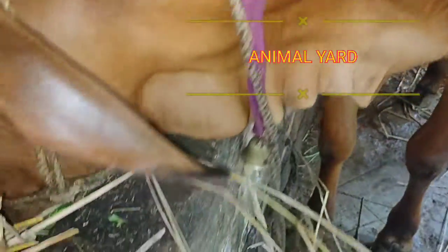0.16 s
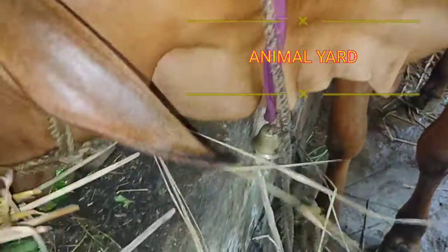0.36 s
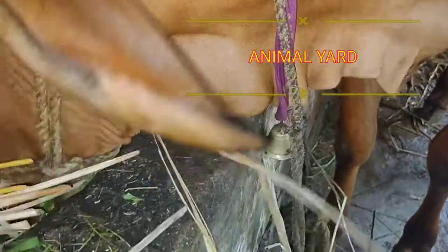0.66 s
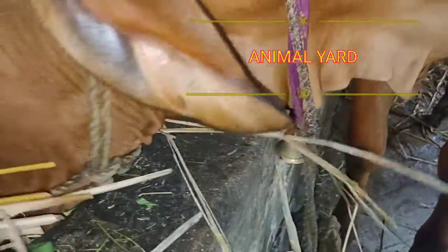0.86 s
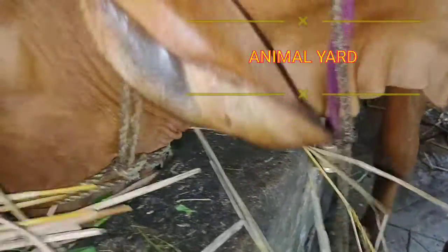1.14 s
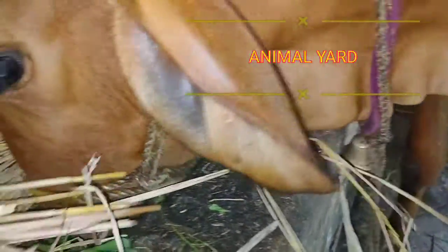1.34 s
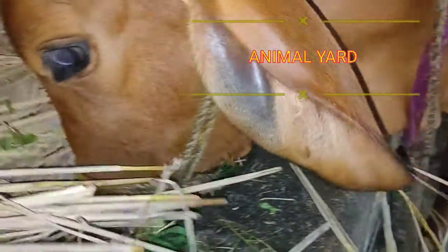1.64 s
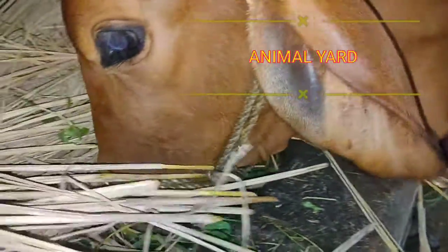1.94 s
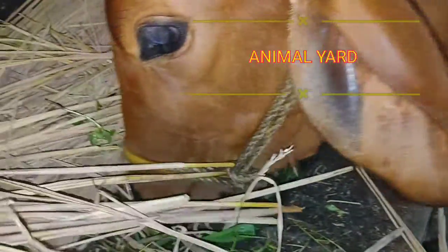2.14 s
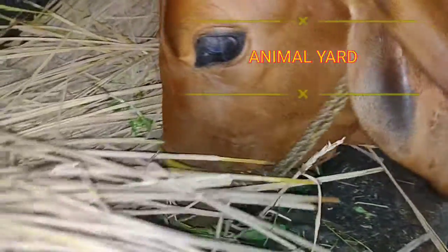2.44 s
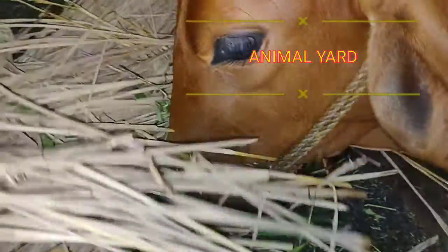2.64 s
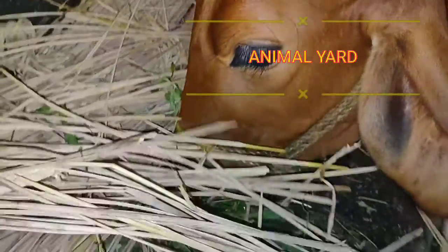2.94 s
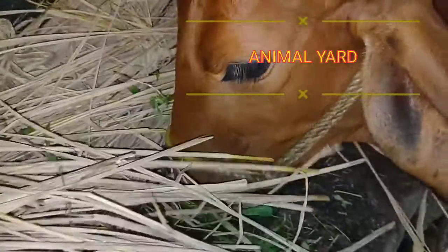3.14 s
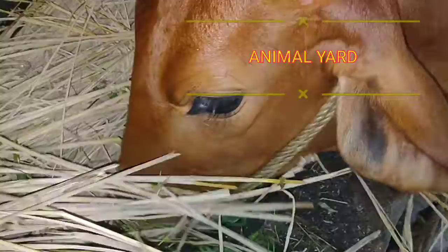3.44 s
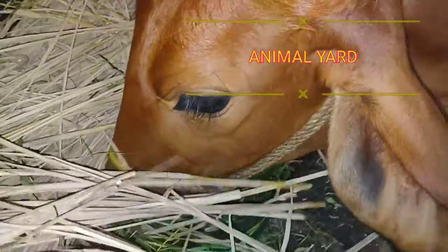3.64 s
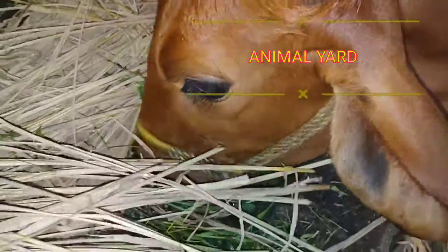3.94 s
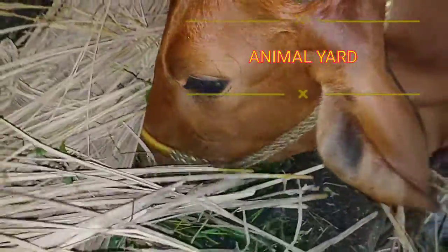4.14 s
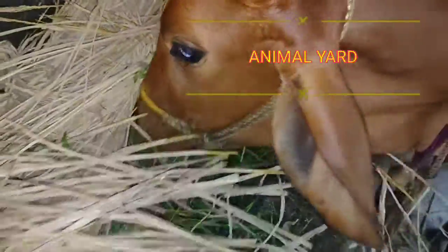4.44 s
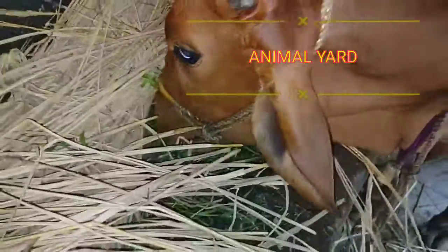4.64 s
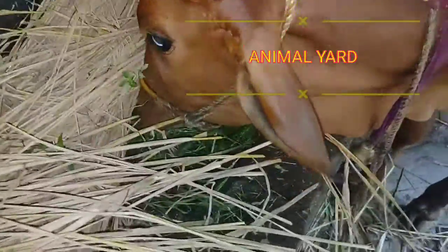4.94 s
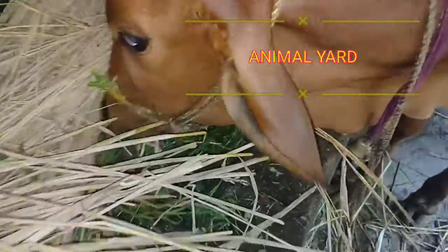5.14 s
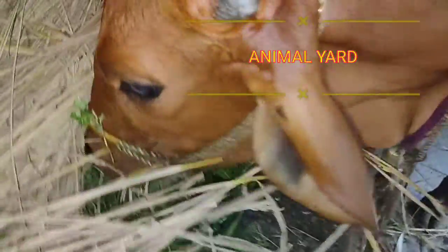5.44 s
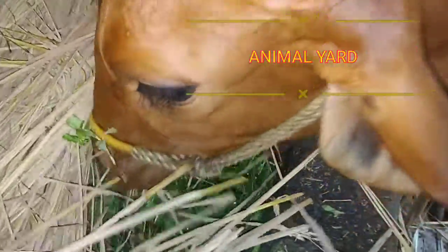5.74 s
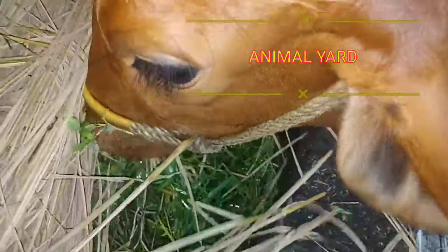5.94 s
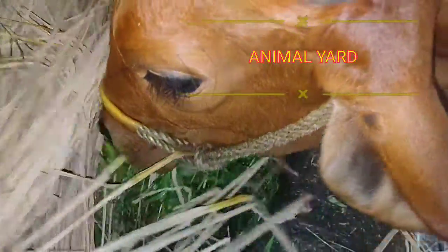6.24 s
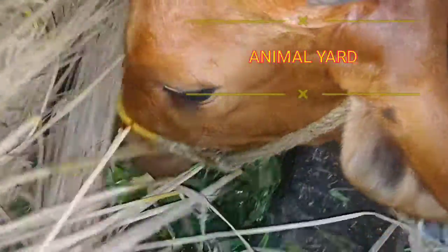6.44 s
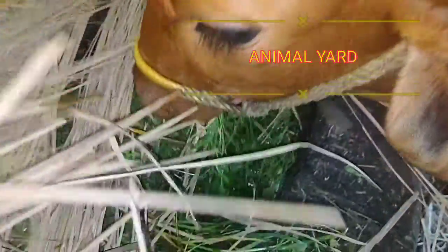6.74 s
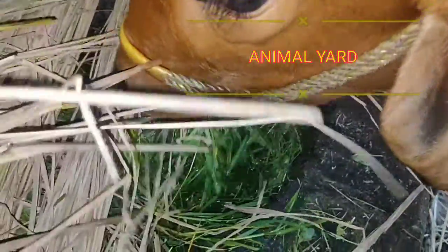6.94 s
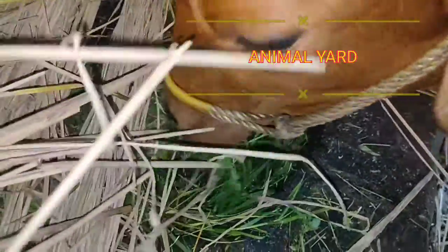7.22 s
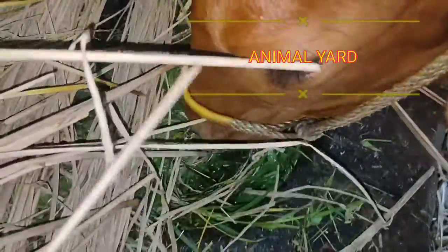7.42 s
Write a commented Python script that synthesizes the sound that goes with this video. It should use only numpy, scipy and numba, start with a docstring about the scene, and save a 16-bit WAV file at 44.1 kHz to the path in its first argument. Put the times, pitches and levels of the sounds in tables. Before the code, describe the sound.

A phone microphone sits close to a cow eating in an open shed with slight short reverberation. From 0 s, soft straw rustling comes in short pushes over a low, wavering, throbbing hum. A muffled crunch at about 0.85 s starts slow, irregular chewing, roughly every 0.8 s, hollow and grinding. Wet smacks click near 1.7-1.9 and 2.7 s. At 2.9-3.1 s dull low trough knocks mix with crunches; grass tearing thickens. Small stalk snaps scatter throughout, a firmer one at 4.3 s. The bird gives tiny faint peeps at 0.5 and 3.8 s, then a quick chatter at 5.3 s and steady, swooping high chirps from 5.5 s to the end, growing loud. Rustling and tearing surge from 6 to 6.9 s, capped by a very loud, bright snap at 6.83 s. Softer rustling, a smack and small snaps finish by 7.5 s.

```python
"""Cow feeding in an open shed

A cow feeds on fresh grass under dry straw, close to a phone. Straw rustles and blades tear as bunches of
tiny random breaks; stalks snap as noise bursts through resonances; the jaw grinds about every 0.8 s
through a moving mouth resonance. Wet smacks, low rubs and dull knocks are short tones.
A low hum wavers and throbs behind; a small bird of swooping tones, faint at first, chirps loudly at the end.
"""
import sys
import numpy as np
from scipy import signal
from scipy.fft import rfft, irfft, next_fast_len
from scipy.io import wavfile
from scipy.ndimage import uniform_filter1d
from numba import njit

SR = 44100
rng = np.random.default_rng(int(sys.argv[2]) if len(sys.argv) > 2 else 0)


def transcribe(signal):
    """Save signal, clipped to [-1, 1], as a 16-bit WAV file at the path in sys.argv[1]."""
    frames = np.atleast_2d(signal).T
    limited = np.clip(frames, -1, 1)
    pcm = np.round(limited * 32767).astype(np.int16)
    wavfile.write(sys.argv[1], SR, pcm)


N = 334258
T = np.arange(N) / SR


def undb(db):
    """Turn decibels into a gain."""
    return 10 ** (np.asarray(db) / 20)


def unit(x):
    """Scale a sound to an average (rms) level of 1."""
    return x / np.sqrt(np.mean(x ** 2))


def curve(table):
    """Join (time_s, value) points with straight lines, sample by sample."""
    return np.interp(T, *np.transpose(table))


def add(track, start_s, sound):
    """Mix a sound into a track at a given time."""
    i = int(start_s * SR)
    track[i:i + len(sound)] += sound[:N - i]


def walk(rate):
    """Wander smoothly and randomly with spread 1, taking `rate` new values a second."""
    k = int(SR / rate)
    steps = np.repeat(rng.standard_normal(N // k + 1), k)
    smooth = uniform_filter1d(uniform_filter1d(steps, k), k)
    return unit(smooth[:N])


def colour(x, points):
    """Filter through (pitch_hz, level_db) points, falling away beyond them, with no pre-echo; rms 1."""
    hz, db = np.transpose(points)
    size = next_fast_len(N + SR // 4) * 2
    log_f = np.log(np.maximum(np.arange(size // 2 + 1) * SR / size, 1))
    outside = np.abs(log_f - np.clip(log_f, np.log(hz[0]), np.log(hz[-1])))
    gain = undb(np.interp(log_f, np.log(hz), db) - 20 * outside)
    # folding the cepstrum gives a filter that only responds after its input
    cepstrum = irfft(np.log(gain))
    cepstrum[1:size // 2] *= 2
    cepstrum[size // 2 + 1:] = 0
    response = np.exp(rfft(cepstrum))
    return unit(irfft(rfft(x, size) * response)[:N])


def ring(x, modes):
    """Pass a sound through side-by-side resonances (pitch_hz, width_hz, level_db)."""
    out = 0
    for hz, width, db in modes:
        out = out + undb(db) * signal.lfilter(*signal.iirpeak(hz, hz / width, fs=SR), x)
    return out


def fibres(rate, spread_db, bunch_db, bunch_rate):
    """Tiny fractures, `rate` a second at random moments, mostly small, that come in bunches."""
    breaks = rng.random(N) < rate / SR
    sizes = undb(spread_db * np.minimum(rng.exponential(size=N), 4))
    signs = rng.choice([-1, 1], N)
    return breaks * sizes * signs * undb(bunch_db * walk(bunch_rate))


def efforts(table, attack_s, release_s, sag_db_per_s):
    """Each event builds up, holds while it sags, and dies away; one gain curve per dB column."""
    power = np.zeros((2, N))
    for start_s, length_s, *levels_db in table:
        near = np.abs(T - start_s) < 1 / 2
        t = T[near] - start_s
        attack = (1 + np.tanh(t / attack_s)) / 2
        release = np.exp(-(np.maximum(t - length_s, 0) / release_s) ** 2)
        shape = attack * undb(-sag_db_per_s * t) * release
        power[:, near] += np.outer(undb(levels_db), shape) ** 2
    return np.sqrt(power)


# Pushes of the muzzle through the fodder: start_s, length_s, straw_rustle_db, grass_tearing_db
MUZZLE_PUSHES = [(0.02, 0.1, -47.5, -52.5), (.115, 0.047, -43.5, -53.5), (.405, .16, -43.5, -51.5),
                 (.635, 0.14, -41, -49.5), (.79, 0.069, -41, -48.5), (.91, 0.074, -42.5, -48),
                 (1.07, 0.13, -44, -55), (1.27, 0.054, -40.5, -49.5), (1.42, 0.071, -43, -54.5),
                 (1.555, 0.026, -39.5, -49), (1.695, 0.029, -40.5, -46), (1.95, 0.11, -43, -48.5),
                 (2.015, 0.19, -42, -48), (2.24, 0.12, -45.5, -49), (2.375, 0.13, -40.5, -48),
                 (2.585, .05, -36.5, -43.5), (2.72, 0.16, -42, -48.5), (2.98, 0.0087, -39.5, -42.5),
                 (3.085, 0.02, -40.5, -46.5), (3.21, 0.15, -48, -46), (3.485, 0.16, -39, -43.5),
                 (3.72, 0.17, -45, -49.5), (3.945, .2, -43, -45), (4.185, 0.26, -43, -45.5),
                 (4.53, 0.14, -43, -48), (4.685, .15, -40, -45.5), (4.945, 0.18, -47.5, -46.5),
                 (5.15, 0.29, -39.5, -48), (5.47, 0.18, -46.5, -47.5), (5.66, 0.16, -42.5, -45),
                 (5.835, 0.17, -37.5, -44.5), (6.045, 0.28, -31.5, -38.5), (6.385, 0.15, -32.5, -40),
                 (6.595, 0.19, -35.5, -40), (6.835, 0.07, -31.5, -39), (7.0, 0.16, -42, -48),
                 (7.255, .19, -43.5, -43.5), (7.545, .03, -40, -49.5)]


def pushes():
    """The muzzle shoves into the heap and eases off: gain curves for straw and grass."""
    return efforts(MUZZLE_PUSHES, attack_s=0.029, release_s=0.097, sag_db_per_s=8.5)


# Tone of sliding straw: pitch_hz, relative_level_db (per Hz)
STRAW_COLOUR = [(1500, -43), (2300, -7.5), (2750, -4), (3400, -6.5), (4300, -6), (5200, -6.5), (6000, -3),
                (6600, -0.5), (7300, -3), (7800, -12), (8200, -28)]
# Tone of tearing grass: pitch_hz, relative_level_db (per Hz)
GRASS_COLOUR = [(600, -33.5), (1200, -3.5), (1600, -4), (2000, -0.5), (2500, 1), (3200, -3.5), (4200, -6.5),
                (6000, -29.5)]
STRAW_REST_DB, GRASS_REST_DB = -49.5, -67.5  # the heap settling between pushes


def fodder(rustle, tear):
    """Dry straw slides in a fine dense crackle; fresh blades tear in coarser, duller grains."""
    straw = colour(fibres(rate=9000, spread_db=2.5, bunch_db=0.5, bunch_rate=63), STRAW_COLOUR)
    grass = colour(fibres(rate=3000, spread_db=1.0, bunch_db=1.55, bunch_rate=70), GRASS_COLOUR)
    straw_gain = np.hypot(rustle, undb(STRAW_REST_DB))
    grass_gain = np.hypot(tear, undb(GRASS_REST_DB))
    return straw_gain * straw + grass_gain * grass


# Strokes of the jaw, as the mouth's resonance slides: start_s, length_s, start_hz, lips_closed_hz
JAW_STROKES = [(0.0, .14, 350, 400), (0.869, .11, 540, 290), (1.534, .14, 470, 310), (2.192, .36, 483, 328),
               (3.051, .31, 502, 300), (4.062, 0.16, 560, 320), (4.672, 0.33, 500, 303),
               (5.561, .22, 382, 280), (6.107, .38, 452, 330), (7.016, 0.4, 481, 249)]
MOUTH_OPEN_HZ, MOUTH_MOVE_S = 613, 0.023


def mouth_resonance():
    """The resonance slides as the lips close through each chew, and comes back when they part."""
    hz = np.full(N, float(MOUTH_OPEN_HZ))
    for start_s, length_s, start_hz, closed_hz in JAW_STROKES:
        closing = (T >= start_s) & (T < start_s + length_s)
        hz[closing] = np.geomspace(start_hz, closed_hz, closing.sum())
    return uniform_filter1d(hz, int(MOUTH_MOVE_S * SR))


@njit
def cavity(x, hz, width):
    """A hollow that rings around one pitch: a band-pass whose centre moves sample by sample."""
    y, band, low = np.empty(len(x)), 0., 0.
    for i in range(len(x)):
        g, k = np.tan(np.pi * hz[i] / SR), width / hz[i]
        v = (band + g * (x[i] - low)) / (1 + g * (g + k))
        band, low, y[i] = 2 * v - band, low + 2 * g * v, k * v
    return y


# Wads of grass giving way between the teeth: start_s, length_s, grinding_db, crunch_db
GRASS_CRUSHES = [(0.0, 0.074, -56, -57), (.85, 0.072, -46.5, -48), (1.08, 0.033, -50.5, -51.5),
                 (1.32, 0.042, -54, -58), (1.545, 0.11, -54.5, -52.5), (1.64, 0.04, -48, -49.5),
                 (1.718, 0.017, -50, -42.5), (1.83, 0.055, -65, -57.5), (1.928, 0.0062, -63, -50),
                 (2.245, 0.034, -41.5, -52), (2.395, 0.072, -42, -43), (2.465, 0.037, -42, -44.5),
                 (2.695, 0.035, -69, -44.5), (2.98, 0.089, -47.5, -53.5), (3.095, 0.039, -37.5, -51),
                 (3.17, .06, -47, -45.5), (3.232, 0.043, -39.5, -40), (3.31, 0.027, -48.5, -51),
                 (4.04, 0.051, -40.5, -41), (4.11, 0.067, -45.5, -48), (4.705, 0.18, -51, -58),
                 (4.855, 0.071, -46.5, -46.5), (4.982, 0.044, -44.5, -47), (5.615, 0.13, -46.5, -48.5),
                 (6.125, 0.046, -40, -49.5), (6.22, 0.12, -45.5, -45.5), (6.39, 0.15, -52.5, -46.5),
                 (6.82, 0.088, -54, -49), (7.025, 0.087, -49, -56), (7.21, .02, -48.5, -49),
                 (7.275, 0.0053, -39.5, -42)]
# Tone of the grinding before the mouth: pitch_hz, relative_level_db (per Hz)
GRIND_COLOUR = [(150, -27.5), (205, 2), (243, 8.5), (272, 3), (305, 2), (400, -2.5), (520, -1), (680, 1),
                (820, -6), (1050, -21), (2500, -47.5)]
# Tone of the crunch: pitch_hz, relative_level_db (per Hz)
CRUNCH_COLOUR = [(450, -30.5), (700, -7.5), (900, -0.5), (1030, -3.5), (1150, 1), (1300, -7), (1500, -6),
                 (2000, -9), (4000, -35)]
# Light grinding that goes on between the crushes: time_s, level_db
LIGHT_GRINDING = [(0, -66), (.35, -59.5), (.58, -70.5), (.75, -57), (1.45, -68.5), (2.1, -66), (2.9, -55),
                  (3.45, -55), (3.9, -61.5), (4.5, -66), (5.4, -68.5), (6.3, -61.5), (7.58, -64)]
GATHERING_DB = -10.5  # the lips gathering blades, against the tearing


def chewing(tear, mouth_width_hz=92.0, cheek_db=-14):
    """Teeth crush the stems; the grinding rings in the mouth and a little leaks through the cheeks."""
    grind, bite = efforts(GRASS_CRUSHES, attack_s=0.014, release_s=0.038, sag_db_per_s=26)
    molars = colour(fibres(rate=1100, spread_db=3.5, bunch_db=0.34, bunch_rate=66), GRIND_COLOUR)
    mouth = cavity(molars, mouth_resonance(), float(mouth_width_hz)) + undb(cheek_db) * molars
    crunch = colour(fibres(rate=1400, spread_db=3.0, bunch_db=1.0, bunch_rate=70), CRUNCH_COLOUR)
    grind_gain = np.hypot(grind, undb(curve(LIGHT_GRINDING)))
    crunch_gain = np.hypot(bite, undb(GATHERING_DB) * tear)
    return grind_gain * unit(mouth) + crunch_gain * crunch


# Stalks snapping: start_s, peak_db, brightness_db (gain of the splitting ring)
STALK_SNAPS = [(0.149, -32.5, -16), (1.067, -26.5, -14), (1.649, -40, -19), (1.722, -35, -16),
               (2.475, -30, -18), (3.01, -29.5, -14), (3.25, -39, -19), (3.283, -29, -28),
               (4.254, -29, -14), (4.278, -22, -20), (4.692, -34, -5), (6.614, -24, -3), (6.83, -9, 7.5),
               (7.222, -30, -23), (7.282, -28, -24), (7.367, -29, -26), (7.455, -24.5, -6)]
# What the body of a stalk rings with: pitch_hz, width_hz, level_db
BODY_RING = [(650, 110, -15.5), (1110, 190, -7), (1760, 300, -7.5), (2380, 950, 11), (3280, 800, -21.5)]
# What a splitting stalk rings with: pitch_hz, width_hz, level_db
SPLIT_RING = [(3050, 870, 10.5), (4860, 1400, -14), (6300, 99, 20.5)]


def snaps(crack_s=0.0019, splinter_s=0.0061, splinter_db=-21):
    """A stalk gives way in a short burst and splinters on; dry ones split brightly."""
    out, t = np.zeros(N), T[:SR // 16]
    soften = signal.butter(2, 4200, fs=SR, output="sos")
    crack = t / crack_s * np.exp(1 - 2 * t / crack_s)
    burst = crack + undb(splinter_db) * np.exp(-t / splinter_s)
    for start_s, peak_db, bright_db in STALK_SNAPS:
        force = burst * rng.standard_normal(len(t))
        body = signal.sosfilt(soften, ring(force, BODY_RING))
        snap = body + undb(bright_db) * ring(force, SPLIT_RING)
        add(out, start_s, undb(peak_db) * snap / np.abs(snap).max())
    return out


# Wet smacks and low rubs near the mouth: start_s, pitch_hz, fade_by_60_db_s, level_db (before the fades)
SMACKS_AND_RUBS = [(.018, 373, 0.15, -42), (.103, 398, 0.15, -43.5), (1.735, 1150, 0.054, -31),
                   (1.752, 1290, 0.081, -33), (1.93, 1110, 0.05, -33), (1.933, 660, 0.035, -33),
                   (2.701, 1060, 0.021, -20), (2.725, 1140, 0.04, -22.5), (3.102, 447, 0.036, -26),
                   (4.77, 432, 0.14, -42), (4.862, 354, 0.12, -34), (4.915, 308, .11, -36.5),
                   (5, 650, 0.16, -35), (5.026, 727, 0.15, -40.5), (6.145, 428, 0.11, -55),
                   (7.284, 245, 0.23, -30), (7.302, 1770, 0.034, -26), (7.311, 1540, 0.022, -19)]


def smacks_and_rubs(rise=0.065, onset_s=0.0032):
    """A smack or low rub rings briefly, rising a little in pitch."""
    out, t = np.zeros(N), T[:SR // 6]
    for start_s, hz, t60, db in SMACKS_AND_RUBS:
        fade = (1 - np.exp(-t / onset_s)) * np.exp(-np.log(1000) * t / t60)
        phase = 2 * np.pi * np.cumsum(hz * (1 + rise * t / t60)) / SR
        add(out, start_s, undb(db) * fade * np.sin(phase))
    return out


# Dull knocks of the muzzle in the trough: middle_s, pitch_hz, half_length_s (to 37 %), swell_db
TROUGH_KNOCKS = [(2.88, 125, 0.0067, -28), (2.919, 149, 0.01, -25), (2.957, 157, 0.0039, -23.5),
                 (2.999, 143, 0.012, -25.5), (3.033, 170, 0.0069, -32), (3.054, 149, 0.0044, -26.5),
                 (3.09, 157, 0.01, -35.5), (7.286, 236, 0.0087, -29.5)]


def knocks():
    """Soft pushes swell and die within a few low cycles."""
    out, t = np.zeros(N), T[:SR // 10] - 1 / 20
    for middle_s, hz, half_s, db in TROUGH_KNOCKS:
        swell = undb(db) * np.exp(-(t / half_s) ** 2)
        add(out, middle_s + t[0], swell * np.sin(2 * np.pi * hz * t))
    return out


# Bird notes: start_s, length_s, start_hz, held_hz, closing_hz, level_db (before shaping and mixing),
# rasp_share (pitch scatter as a share of the pitch)
BIRD_NOTES = [(0.479, 0.036, 2900, 2790, 2790, -48, 0.0045), (3.829, 0.035, 2950, 2820, 2820, -40, 0.0044),
              (4.343, .04, 4400, 4410, 4370, -44, 0.023), (5.258, 0.026, 4450, 4250, 4230, -35.5, 0.034),
              (5.286, 0.013, 3840, 4080, 4080, -25.5, 0.052),
              (5.314, 0.0098, 3860, 4010, 4080, -25.5, 0.083), (5.338, 0.018, 3955, 4100, 3984, -25, 0.029),
              (5.36, 0.012, 3800, 3970, 3920, -28.5, 0.079), (5.453, 0.038, 2950, 2845, 2510, -31, 0.033),
              (5.508, 0.013, 3380, 3410, 3320, -18.5, 0.0036), (5.51, 0.022, 3250, 3000, 2295, -24, 0.0093),
              (5.661, 0.063, 4400, 3184, 2520, -20, 0.011), (5.84, 0.037, 4200, 3150, 2650, -20, 0.0094),
              (5.999, 0.044, 4000, 3088, 2790, -20.5, 0.0084), (6.16, 0.07, 3500, 2861, 2830, -25, 0.017),
              (6.312, 0.014, 4280, 4060, 3770, -25.5, 0.042),
              (6.317, 0.041, 4200, 3094, 2720, -19.5, 0.021), (6.482, 0.05, 4150, 3290, 3254, -18.5, 0.053),
              (6.676, 0.042, 3700, 3310, 3186, -21, 0.033), (6.866, 0.037, 4150, 3014, 3040, -16, 0.0068),
              (6.936, 0.045, 3250, 2628, 2634, -20.5, 0.006), (7.118, 0.031, 3910, 3165, 3526, -16, 0.016),
              (7.154, 0.029, 3885, 2945, 2470, -23, 0.015), (7.345, 0.046, 4294, 2857, 2873, -21, 0.01),
              (7.407, 0.031, 3500, 2844, 2674, -25, 0.012)]


def bird(swoop_s=0.013, close_s=0.008, onset_s=0.0014, release_s=0.0019, flutter_db=-0.65, strain_db=-28):
    """Each note swoops to a held pitch and bends as the beak closes; a fast quaver makes some rasp."""
    out, quaver, flutter = np.zeros(N), walk(600), undb(flutter_db * walk(300))
    for start_s, length_s, start_hz, held_hz, close_hz, db, rasp in BIRD_NOTES:
        t = T[:int(length_s * SR)]
        now = int(start_s * SR) + np.arange(len(t))
        swoop = (start_hz - held_hz) * np.exp(-(t / swoop_s) ** 2)
        closing = (close_hz - held_hz) * np.exp((t - length_s) / close_s)
        hz = held_hz + swoop + closing
        phase = 2 * np.pi * np.cumsum(hz * (1 + rasp * quaver[now])) / SR
        swell = np.tanh((t / onset_s) ** 2) * np.tanh((length_s - t) / release_s)
        # the voice is thinner for each octave that it is still above the held pitch
        strain = strain_db * np.log2(np.maximum(hz / held_hz, 1))
        add(out, start_s, undb(db + strain) * swell * flutter[now] * np.sin(phase))
    return out


# Slow drift of the hum: time_s, level_db
HUM_DRIFT = [(0, -44), (.8, -43), (3.3, -40.5), (5, -39), (5.8, -42.5), (7.58, -38)]
# The hum swells or sinks briefly: middle_s, half_length_s (to 37 %), change_db
HUM_SWELLS = [(0.503, 0.022, 8), (0.622, 0.032, -23), (.77, 0.12, 4.5), (1.23, 0.023, -19),
              (1.35, 0.037, 7), (1.7, 0.066, -28), (1.815, 0.027, 3), (2.042, 0.03, 4.5), (2.245, 0.017, 4),
              (2.65, 0.11, -5.5), (3.42, 0.067, -6), (3.65, 0.056, 6), (4.38, 0.03, -10),
              (4.534, 0.035, 4.5), (5.12, .03, -10), (5.233, .03, 7), (5.746, 0.091, 10.5),
              (6.269, 0.026, 12), (6.425, 0.025, -5), (6.713, .04, 13.5), (7.206, 0.03, 6.5)]


def hum(hz=104.0, waver_hz=5, throb_db=3.0, throb_rate=25, flutter_db=0.5, mains_hz=100, buzz_db=-64):
    """A low tone wavers in pitch and throbs in level, with a faint mains buzz."""
    phase = 2 * np.pi * np.cumsum(hz + waver_hz * walk(34)) / SR
    surges = sum(db * np.exp(-((T - s) / half_s) ** 2) for s, half_s, db in HUM_SWELLS)
    level_db = curve(HUM_DRIFT) + surges + throb_db * walk(throb_rate) + flutter_db * walk(45)
    tone = undb(level_db) * np.sin(phase)
    # only the second and third multiples of mains_hz sound
    second = np.sin(2 * np.pi * 2 * mains_hz * T)
    third = undb(-9.5) * np.sin(2 * np.pi * 3 * mains_hz * T)
    buzz = undb(buzz_db + 2.8 * walk(8.2)) * (second + third)
    return np.sqrt(2) * (tone + buzz)  # a sine's peak is sqrt(2) times its rms


# Tone of the rumble under the hum: pitch_hz, relative_level_db (per Hz)
RUMBLE_COLOUR = [(25, -11), (40, -41.5), (60, -20.5), (80, -5.5), (98, -8), (112, 4), (130, 2.5),
                 (150, -13.5), (195, -11.5), (230, -27.5), (400, -43), (620, -28), (900, -51.5),
                 (3000, -52.5)]
# Slow drift of the rumble: time_s, level_db
RUMBLE_DRIFT = [(0, -49.5), (1.8, -47), (3.4, -45), (5, -47), (5.8, -38), (7.58, -42)]


def rumble():
    """Random noise, narrowed to low pitches, drifts slowly in level."""
    return undb(curve(RUMBLE_DRIFT)) * colour(rng.standard_normal(N), RUMBLE_COLOUR)


def shed(x, early_db, late_db, early_t60=0.32, late_t60=0.89, gap_s=0.006):
    """Quick reflections from the near walls, then a thin longer tail, as fading noise (t60 in s)."""
    t = T[:SR]
    response = 0
    for db, t60 in (early_db, early_t60), (late_db, late_t60):
        tail = rng.standard_normal(SR) * np.exp(-np.log(1000) * t / t60) * (t > gap_s)
        response = response + undb(db) * tail / np.linalg.norm(tail)
    return signal.fftconvolve(x, response)[:N]


def scene():
    """The cow is close and nearly dry, the bird further off; both channels are alike."""
    rustle, tear = pushes()
    cow = fodder(rustle, tear) + chewing(tear) + snaps() + smacks_and_rubs()
    chirps = bird()
    mono = cow + shed(cow, early_db=-19, late_db=-19.5)
    mono = mono + knocks() + hum() + rumble()
    mono = mono + undb(-3.0) * chirps + shed(chirps, early_db=-3, late_db=-8.5)
    return np.array([mono, mono])


TOP_HZ = 8300


def record(dry):
    """The phone cuts the top steeply: a low-pass with 0.2 dB ripple and an 85 dB drop."""
    return signal.sosfilt(signal.ellip(12, 0.2, 85, TOP_HZ, fs=SR, output="sos"), dry)


dry = scene()
out = record(dry)
transcribe(out)
```